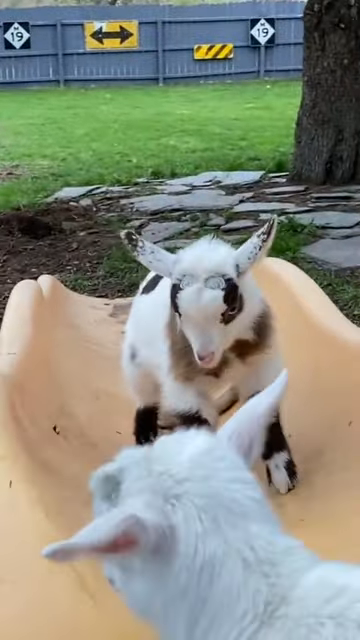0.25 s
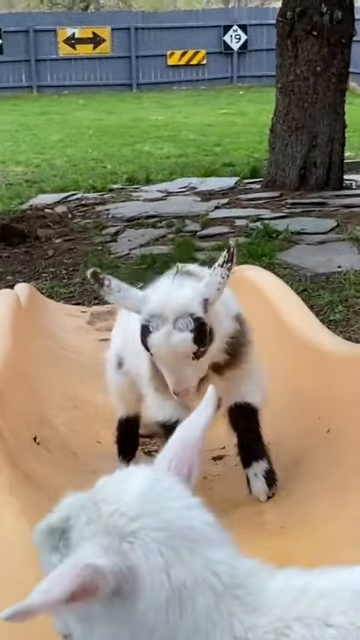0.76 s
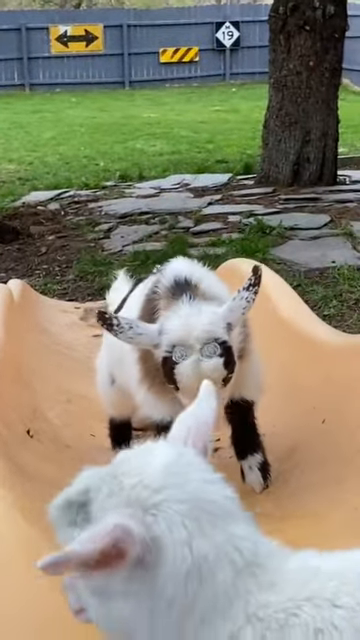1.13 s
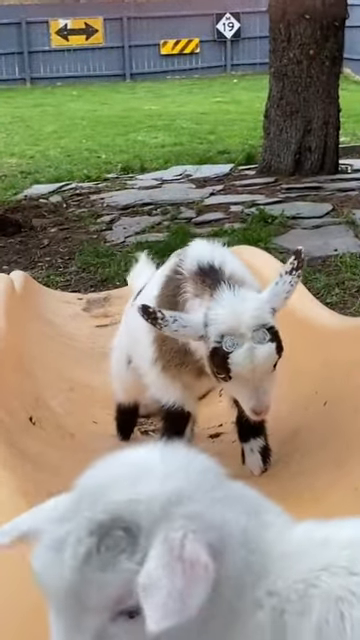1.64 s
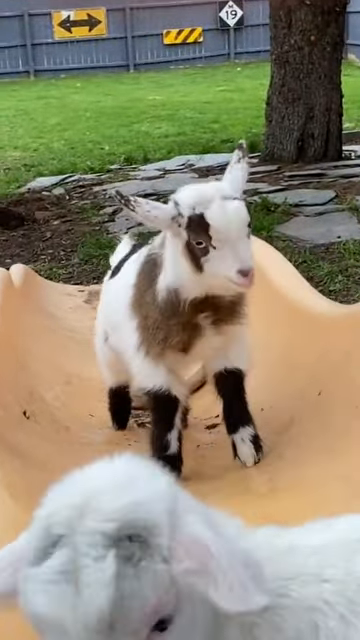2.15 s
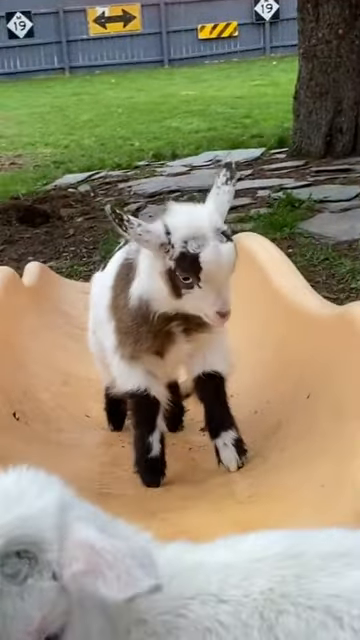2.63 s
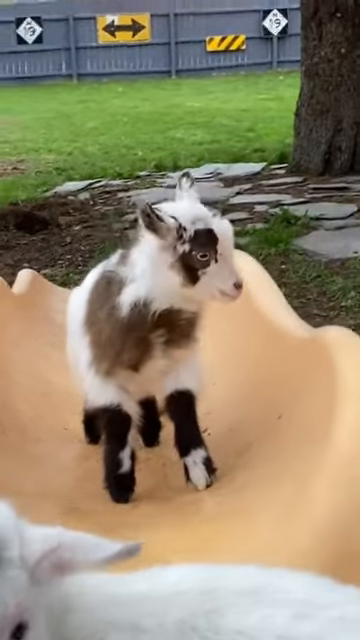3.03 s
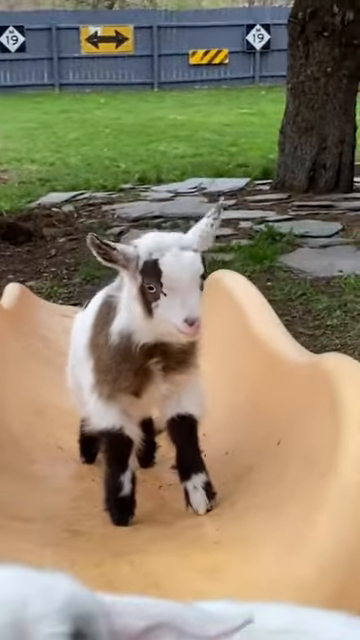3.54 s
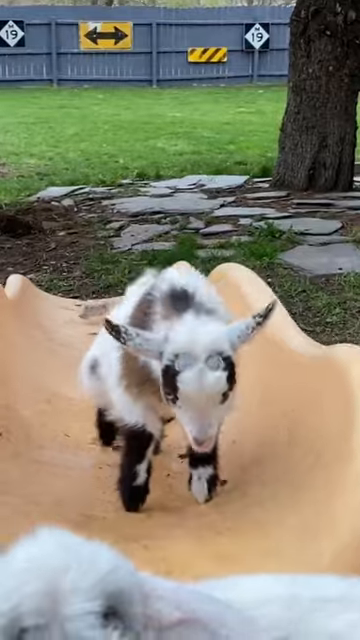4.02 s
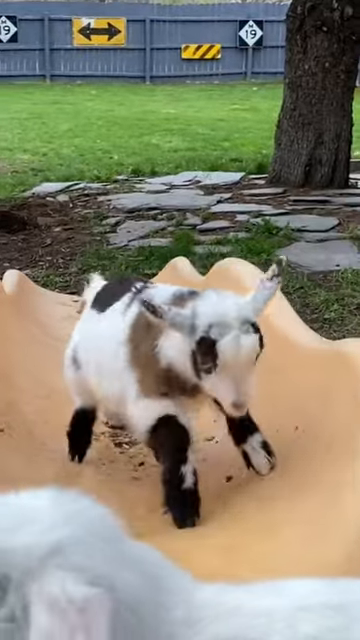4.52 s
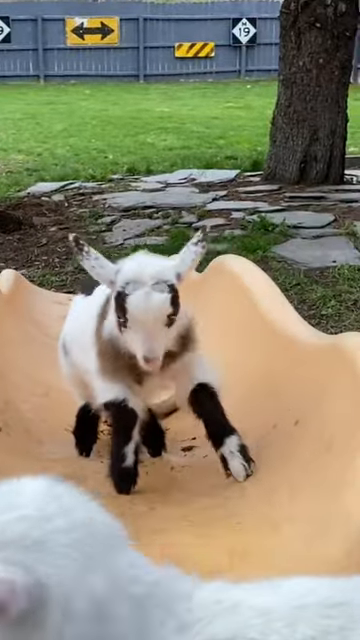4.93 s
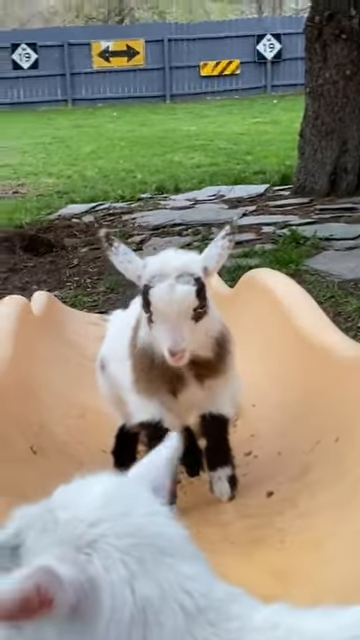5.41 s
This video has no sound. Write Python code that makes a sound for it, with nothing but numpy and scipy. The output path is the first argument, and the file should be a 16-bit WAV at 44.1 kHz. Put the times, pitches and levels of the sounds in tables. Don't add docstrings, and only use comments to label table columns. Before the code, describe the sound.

Outdoors in a yard, a small goat's hoof taps a hollow plastic slide once, then mostly quiet with faint wool brushing. Near three seconds five hard, boomy raps come evenly and fade; around four seconds a fast clatter of lighter knocks scrambles with slipping hiss. One final hard rap ends it. Close stereo microphone, low distant traffic, tiny bird peeps.

```python
import sys
import numpy as np
from scipy import signal
from scipy.fft import rfft, irfft
from scipy.io import wavfile

SR = 44100
rng = np.random.default_rng(int(sys.argv[2]) if len(sys.argv) > 2 else 0)


def store_pcm(level_fs):
    pcm = np.round(np.clip(level_fs, -1, 1) * 32767).astype(np.int16)
    wavfile.write(sys.argv[1], SR, np.atleast_2d(pcm).T)


def ratio_of_db(decibels):
    return 10 ** (np.asarray(decibels, float) / 20)


N = 249606
HZ = np.maximum(np.fft.rfftfreq(N, 1 / SR), 1)

# start in seconds, peak in dB, crack in dB, loudest wall mode in Hz,
# crack tilt in dB per octave.
RAPS = [
    (2.7109, -8, -3, 636, 3),
    (2.891, -8.5, 1, 407, -6),
    (3.040, -10.5, 1, 463, -0.8),
    (3.181, -12.5, -4.5, 500, 2.7),
    (3.317, -16.5, 4.5, 343, -1.2),
    (5.506, -9.5, 1, 390, -2),
]
# start in
# seconds, peak in dB, crack in dB, drum in dB, loudest wall mode in Hz.
STEPS = [(.0207, -24.5, -13, -8, 803), (.044, -46, -9, -8, 630), (2.03, -48.5, -8, -10, 600),
         (2.07, -44, -6, -12, 800), (4.178, -27.5, -6, -3, 500), (4.318, -27, -12, 3, 443),
         (3.371, -43.5, 7, -2, 403), (4.113, -16.5, 9, 4, 715), (4.125, -17.5, -26, 1.5, 408),
         (4.148, -17.5, 5.5, 6.5, 1440), (4.164, -18, -15, 1, 376), (4.207, -10.5, 1.5, -3, 804),
         (4.214, -15, -6.5, -16, 604), (4.232, -26, -6.5, -4, 570), (4.270, -16.5, 11, 6.5, 1040),
         (4.283, -17.5, -14, 2, 437), (4.309, -25, -15, 2.5, 690), (4.334, -27, 8, -2.5, 490),
         (4.37, -30, 11, -8, 920), (4.796, -25, -23, -1, 450), (4.819, -32, -8, -6, 425),
         (4.845, -37.5, -6, -13, 496), (5.239, -38, -14, -16, 550)]
# frequency in Hz, level in dB, 60 dB decay time in seconds.
DRUM = [(40.8, -18, 0.5), (58, -2, 0.33), (98.6, -13, 0.55), (119.2, -5, 0.29), (136.4, 0.5, 0.2),
        (189.6, -5.5, 0.13), (233.5, -16.5, 0.2), (279.4, -16, 0.23), (319.1, -9.5, 0.21), (390, -11, 0.17),
        (489, -2.5, 0.062), (575, -27, 0.039), (771, -13, 0.055), (1021, -28.5, 0.39), (1410, -29.5, .12),
        (1720, -17, 0.18)]
# frequency in Hz, level in dB.
WALL_NEAR = [(110, -49), (180, -6.5), (406, -1), (551, -6), (1030, -7.5), (1240, -31), (1450, -3),
             (2060, -25), (3000, -25.5), (3900, -60.5), (6600, -120)]
# frequency in Hz, level in dB.
WALL_FAR = [(110, -31), (180, 0), (435, -7), (551, 2.5), (627, -2.5), (981, -6), (3000, -27), (3900, -61),
            (6600, -120)]
# frequency in Hz, 60 dB decay time in seconds.
WALL_T60 = [(180, 0.39), (400, 0.21), (800, 0.16), (1500, 0.13), (3000, 0.13)]
# frequency in Hz, level in dB.
CRACK = [(710, -32), (1200, -64), (1940, -4.5), (2430, 13), (3080, 1.5), (5310, -0.5), (6110, 1.5),
         (7250, -14), (11900, -36), (13900, -63), (15500, -43)]
# frequency in Hz, level in dB.
SHIVER = [(1060, -1.5), (1800, 0.5), (2270, -2), (3250, -10.5), (5190, -13.5), (5590, -13.5), (6610, -20.5),
          (8630, -21.5), (11700, -32), (13200, -33.5)]
# start in seconds, peak in dB, low edge in Hz, high edge in Hz.
TICKS = [(.829, -60, 7000, 13000), (1.385, -65, 6000, 13000), (1.615, -63, 5000, 14000),
         (1.902, -59, 6000, 13000), (2.477, -34.5, 1890, 5880), (2.709, -20, 1524, 3490),
         (2.891, -26, 1516, 3500), (4.111, -27, 5490, 12400), (4.271, -26, 7100, 12800),
         (5.155, -47, 5500, 7500), (5.195, -63, 5000, 13500), (5.286, -51, 4000, 13000)]
# middle in seconds, length in seconds, top level in dB.
SCUFF = [(.03, .2, -69.5), (.13, .24, -69), (.23, 0.15, -69), (.52, 0.077, -79), (.865, 0.087, -69),
         (1.125, .09, -89), (1.47, .06, -87), (1.59, .11, -85), (1.93, .09, -84), (2.075, .11, -72),
         (3.535, .05, -81), (3.775, .13, -72.5), (3.925, 0.1, -60), (4.09, 0.21, -57), (4.19, .2, -45.5),
         (4.34, 0.17, -54.5), (4.445, .11, -59), (4.562, 0.062, -67.5), (4.69, .08, -64),
         (4.75, .05, -69.5), (4.82, .1, -64), (4.99, 0.25, -64.5), (5.085, 0.058, -65),
         (5.288, 0.0086, -73), (5.34, .12, -82)]
# frequency in Hz, level in dB.
SCUFF_COLOUR = [(2940, -37), (5000, -19.5), (6750, -15), (8380, -14), (9570, -13), (10700, -8.5),
                (12400, -20), (13000, -18), (13600, -70), (14000, -29), (14300, -19), (15000, -20),
                (16200, -32)]
# middle in seconds, length in seconds, top level in dB.
BRUSH = [(0.01, 0.25, -74), (.22, .25, -67.5), (.37, 0.091, -70), (.99, 0.19, -65.5), (1.11, 0.21, -62),
         (1.92, .14, -74), (2.08, .16, -74.5), (2.28, 0.41, -73.5), (2.49, 0.04, -61), (2.54, .14, -77),
         (2.83, 0.19, -65), (3.37, 0.071, -61.5), (3.85, 0.76, -72), (4.19, .22, -53), (4.35, .11, -58),
         (4.47, .3, -70.5), (4.69, .13, -72), (4.82, .12, -72), (5.0, 0.19, -71.5), (5.32, .3, -70)]
# frequency in Hz, level in dB.
BRUSH_COLOUR = [(900, -19), (1900, 6.5), (3000, -0.5), (4200, -1.5), (5200, -7), (6300, -4), (8000, -18.5),
                (12000, -41.5)]
# start in seconds, length in seconds, pitch in Hz, level in dB, glide in Hz per second.
PEEPS = [
    (1.215, 0.029, 3160, -57, -5000),
    (2.21, 0.083, 3080, -60.5, 2500),
    (5.34, 0.033, 5720, -61, -500),
    (5.573, 0.081, 3640, -56, -3000),
    (5.581, .05, 3300, -60, -3000),
]
# time in seconds, road hiss in dB.
YARD = [(0, -54), (.34, -54.5), (.6, -56), (.98, -55), (1.3, -56.5), (1.8, -56), (2.66, -56), (3.1, -53),
        (3.55, -53), (3.8, -52.5), (4.05, -49.5), (4.5, -50.5), (4.8, -51), (5.1, -50.5), (5.66, -50)]
# frequency in Hz, level in dB.
YARD_COLOUR = [(12, -56), (20, -34.5), (65, 2), (124, -6.5), (197, -18), (380, -23), (412, -22),
               (692, -17.5), (1480, -20), (2170, -28.5), (2490, -32), (5060, -44), (5490, -48),
               (10300, -59.5), (12600, -65)]
# frequency in Hz, left-right likeness from -1 to 1.
LIKENESS = [(60, 1), (130, 0.81), (290, 0.64), (640, -0.16), (1410, -0.055), (3100, 0.27), (6820, -0.0096),
            (15000, 0.012)]
# frequency in Hz, left minus right in dB.
PORTS = [(60, -4), (180, -3), (550, 0), (1650, 3), (4970, 1.5), (15000, -2.5)]
# frequency in Hz, left minus right in dB.
NEAR_PORTS = [(60, -3), (150, -4), (380, -5), (950, -7.5), (2380, 3), (5980, 6), (15000, -19)]
# frequency in Hz, lead in radians.
NEAR_LEAD = [(30, 0.3), (150, -1.0), (350, -2.0), (700, -2), (2150, -2.5), (3530, -6.5), (6200, -11),
             (15100, -23.5)]
# frequency in Hz, lead in radians.
FAR_LEAD = [(30, -0.85), (690, 0.65), (1460, 1.2), (3190, 1.5), (8000, 1.7)]
# frequency in Hz, lead in radians.
SCUFF_LEAD = [(5000, 0), (7900, -2.5), (10400, -5.9), (12700, -8.5), (16500, -10)]

BENDING = .105
RAP_DRUM_DB = 2
FENCE_DELAY_S, FENCE_DB, FENCE_LOW_HZ, FENCE_HIGH_HZ = .066, -32.5, 1800, 7500
SCUFF_EDGE_DB, SCUFF_SQUARENESS = 20, 2.06
BRUSH_EDGE_DB, BRUSH_SQUARENESS = 12, 1.7
DRAG_DB, DRAG_FOLLOWS = -41.5, 1
PEEP_WAVER, PEEP_WAVER_PER_S = .25, 70
CALM_DB = -56.5
RUMBLE_DB, RUMBLE_FOLLOWS = -50, .2
DRONE_DB, DRONE_FOLLOWS = -67, 2.26


def at_hz(points, hz):
    table_hz, value = np.array(points).T[:2]
    return np.interp(np.log(hz), np.log(table_hz), value)


def add(track, s, sound):
    at = round(s * SR)
    track[:, at:at + sound.shape[1]] += sound[:, :N - at]


def drift(rate):
    knots = rng.standard_normal(500)
    return np.interp(np.arange(N) / SR * rate, np.arange(500), knots)


def stereo_noise(colour, low_hz, high_hz, grain_db=0., lead=None):
    grains = ratio_of_db(grain_db * np.minimum(rng.exponential(1, N), 4))
    white = rng.standard_normal((2, N)) * grains
    mid, side = rfft(white) * ratio_of_db(at_hz(colour, HZ)) * (HZ < colour[-1][0])
    alike = np.clip(at_hz(LIKENESS, HZ) if lead is None else .8, -.99, .99)
    pair = np.sqrt(1 + alike) * mid + np.sqrt(1 - alike) * side * [[1], [-1]]
    pair = pair * ratio_of_db(at_hz(PORTS, HZ) * [[.5], [-.5]])
    if lead is not None:
        pair = pair * np.exp(.5j * at_hz(lead, HZ) * [[1], [-1]])
    inside = irfft(pair.mean(axis=0) * (HZ > low_hz) * (HZ < high_hz), N)
    return pair / np.sqrt(np.mean(inside ** 2))


def ringing(hz, t60, rise_cycles, size):
    delay = BENDING / np.sqrt(hz)[:, None]
    t = np.maximum(np.arange(size) / SR - 0.58 * delay, 0)
    swell = (1 - np.exp(-hz[:, None] * t / rise_cycles)) ** 2
    phase = 2j * np.pi * hz[:, None] * (np.arange(size) / SR - 2 * delay)
    return swell * np.exp(phase - np.log(1000) / t60[:, None] * t)


def strike(times, mode_db, hz, rings, side, disorder, change, scatter):
    out = np.zeros((2, N))
    shape = disorder * rng.standard_normal(len(hz))
    draws = rng.standard_normal((len(times), 3, len(hz)))
    balance, lead = side
    ports = ratio_of_db(at_hz(balance, hz) * [[.5], [-.5]]) * np.exp(.5j * at_hz(lead, hz) * [[1], [-1]])
    for s, db, (size, turn, apart) in zip(times, mode_db, draws):
        push = ratio_of_db(db + 6.56 * change * size) * np.exp(1j * (shape + 2 * change * turn))
        scattered = np.exp(1j * scatter * apart * [[1], [-1]])
        add(out, s - .0013, ((push * ports * scattered) @ rings).real)
    return out


def hooves(events, wall, side, wall_db, crack_db, drum_db, deep_db, change, decay, focus_db):
    s = np.array(events)[:, 0]
    db, crack, drum, spot_hz, *tilt = np.transpose(events)[1:, :, None]

    hz = np.geomspace(180, 3000, 130) * ratio_of_db(rng.normal(0, 0.085, 130))
    per_mode = 10 * np.log10(hz / 180)
    spot = focus_db * np.exp(-(np.log(hz / spot_hz) / 0.32) ** 2)
    rings = ringing(hz, decay * at_hz(WALL_T60, hz), rise_cycles=0.78, size=9000)
    mode_db = db + wall_db + at_hz(wall, hz) + per_mode + spot
    out = strike(s, mode_db, hz, rings, side, 1.0, change, scatter=0.36)

    hz = np.geomspace(1200, 15300, 60) * ratio_of_db(rng.normal(0, 0.13, 60))
    rings = ringing(hz, np.full(60, .016), rise_cycles=1.5, size=1800)
    colour = at_hz(CRACK, hz) + 10 * np.log10(hz / 1200) + sum(tilt) * np.log2(hz / 3500)
    out += strike(s, db + crack + crack_db + colour, hz, rings, side, 1.15, 0.51, scatter=0.28)

    hz, mode_db, t60 = np.transpose(DRUM)
    spot = focus_db * np.exp(-(np.log(hz / spot_hz) / 0.062) ** 2)
    spot = spot + deep_db * (hz < 70)
    rings = ringing(hz, t60 * np.sqrt(decay), rise_cycles=0.36, size=16000)
    mode_db = db + drum + drum_db + mode_db + spot
    return out + strike(s, mode_db, hz, rings, side, 0.26, 0.82 * change, scatter=0.041)


def shiver(events, level_db, t60, lead):
    shape = np.zeros((1, N))
    t = np.arange(8000)[None] / SR - .012
    fall = ratio_of_db(-60 * t / t60) + 1.85 * ratio_of_db(-60 * t / 0.044)
    swell = np.where(t < 0, 0.85 * np.exp(t / 0.004), fall)
    for s, db, crack, *_ in events:
        add(shape, s - .012, ratio_of_db(db + 0.2 * crack + level_db) * swell)
    flutter = ratio_of_db(3 * drift(85))
    return shape * flutter * irfft(stereo_noise(SHIVER, 1490, 12400, grain_db=4.0, lead=lead), N)


def fence(raps):
    out = np.zeros((2, N))
    band = signal.butter(2, [FENCE_LOW_HZ, FENCE_HIGH_HZ], "band", fs=SR, output="sos")
    add(out, FENCE_DELAY_S, ratio_of_db(FENCE_DB) * signal.sosfilt(band, raps[::-1]))
    return out


def ticks():
    out, t = np.zeros((2, N)), np.arange(1500) / SR
    for s, db, low_hz, high_hz in TICKS:
        snap = rng.standard_normal((2, 1500)) * (np.exp(-t / 0.0024) + 0.13 * np.exp(-t / 0.011))
        ceiling = signal.butter(2, 1.5 * high_hz, fs=SR, output="sos")
        band = signal.butter(2, [low_hz, high_hz], "band", fs=SR, output="sos")
        add(out, s, ratio_of_db(db) * signal.sosfilt(band, signal.sosfilt(ceiling, snap)))
    return out


def while_moving(strokes, edge_db, squareness):
    t, level = np.arange(0, N + 64, 64) / SR, -130
    for s, length, db in strokes:
        level = np.maximum(level, db - edge_db * np.abs(2 * (t - s) / length) ** squareness)
    return np.interp(np.arange(N) / SR, t, level)


def rubbing():
    scuff = stereo_noise(SCUFF_COLOUR, 8200, 12900, grain_db=5.0, lead=SCUFF_LEAD)
    brush = irfft(stereo_noise(BRUSH_COLOUR, 3500, 7500, grain_db=2), N)
    scuff_db = while_moving(SCUFF, SCUFF_EDGE_DB, SCUFF_SQUARENESS)
    top = irfft(scuff * (HZ > 14300), N) / (1 + ratio_of_db(3.0 * (-74 - scuff_db + 3 * drift(18))))
    scuff = (irfft(scuff * (HZ < 13000), N) + top) * ratio_of_db(scuff_db + 1.25 * drift(45))
    brush = brush * ratio_of_db(while_moving(BRUSH, BRUSH_EDGE_DB, BRUSH_SQUARENESS) + drift(32))
    wall = signal.butter(2, [300, 1250], "band", fs=SR, output="sos")
    grains = rng.standard_normal((2, N)) * ratio_of_db(3.1 * np.minimum(rng.exponential(1, N), 4))
    drag = signal.sosfilt(wall, grains * ratio_of_db(DRAG_DB + DRAG_FOLLOWS * (scuff_db - CALM_DB)))
    return scuff + brush + drag


def birds():
    out = np.zeros((2, N))
    for s, length, hz, db, glide in PEEPS:
        t = np.arange(round(length * SR)) / SR
        turns = hz * t + glide * t ** 2 / 2 + PEEP_WAVER * drift(PEEP_WAVER_PER_S)[:len(t)]
        whistle = np.sin(2 * np.pi * (turns + [[0], [.2]]))
        add(out, s, ratio_of_db(db) * np.hanning(len(t)) ** .5 * whistle)
    return out


def yard():
    low, high = 1 / (1 + (HZ / 160) ** 4), 1 / (1 + (470 / HZ) ** 4)
    s, road_db = np.transpose(YARD)
    hiss_db = np.interp(np.arange(N) / SR, s, road_db)
    rumble_db = RUMBLE_DB + RUMBLE_FOLLOWS * (hiss_db - CALM_DB)
    drone_db = DRONE_DB + DRONE_FOLLOWS * (hiss_db - CALM_DB)
    rumble = irfft(stereo_noise(YARD_COLOUR, 42, 130) * np.sqrt(low), N)
    drone = irfft(stereo_noise(YARD_COLOUR, 208, 410) * np.sqrt((1 - low) * (1 - high)), N)
    hiss = irfft(stereo_noise(YARD_COLOUR, 340, 3800) * np.sqrt(high), N)
    rumble = rumble * ratio_of_db(rumble_db + 0.27 * drift(13))
    hiss = hiss * ratio_of_db(hiss_db + 0.59 * drift(18))
    return rumble + drone * ratio_of_db(drone_db) + hiss


def scene():
    near, far = (NEAR_PORTS, NEAR_LEAD), (PORTS, FAR_LEAD)
    blows = [(s, db, crack, RAP_DRUM_DB, hz, tilt) for s, db, crack, hz, tilt in RAPS]
    raps = hooves(blows, WALL_NEAR, near, wall_db=-21.0, crack_db=-15.0, drum_db=-1.5, deep_db=-0.7,
                  change=0.36, decay=0.84, focus_db=3.5)
    steps = hooves(STEPS, WALL_FAR, far, wall_db=-28.0, crack_db=-46, drum_db=-12.5, deep_db=-5,
                   change=0.47, decay=0.71, focus_db=9.5)
    tails = shiver(RAPS, level_db=-21.5, t60=.17, lead=NEAR_LEAD)
    tails = tails + shiver(STEPS, level_db=-32.5, t60=0.082, lead=FAR_LEAD)
    return raps + fence(raps) + steps + tails + ticks() + rubbing() + birds() + yard()


def top_cut(x):
    return signal.sosfilt(signal.butter(12, 16950, fs=SR, output="sos"), x)


def record(dry):
    limited = 1.025 * np.tanh(dry / 1.176)
    thinned = np.where((HZ > 12900) & (HZ < 14300), ratio_of_db(-13.5), 1)
    wave = rfft(limited) * (HZ < 16300) * thinned
    narrow = irfft(wave * (HZ > 8150) * (HZ < 8850), N)
    dropped = narrow * np.clip(3 * drift(20) + 0.13, 0, 1)
    return top_cut(irfft(wave, N) - dropped)


dry = scene()
out = record(dry)
store_pcm(out)
```